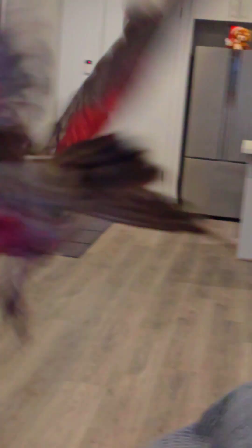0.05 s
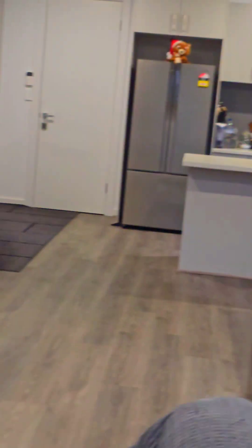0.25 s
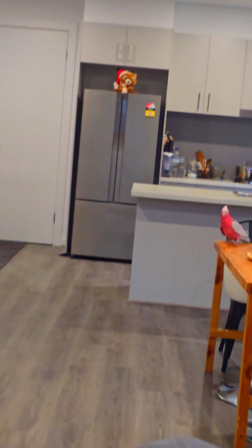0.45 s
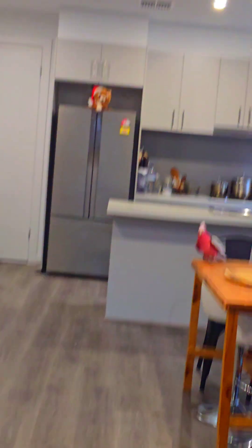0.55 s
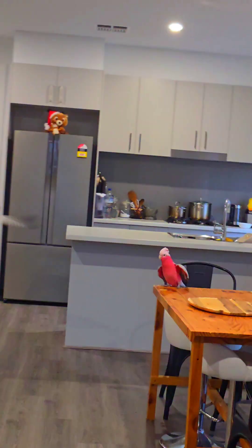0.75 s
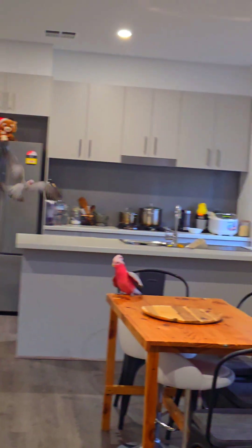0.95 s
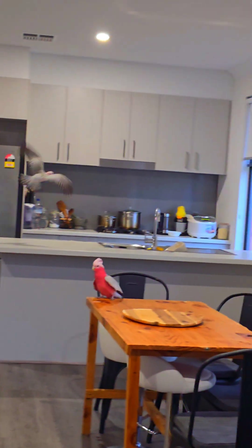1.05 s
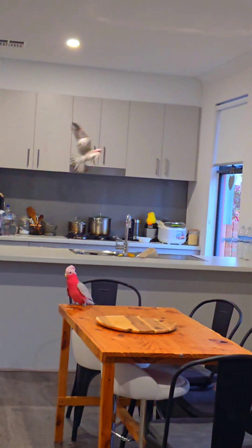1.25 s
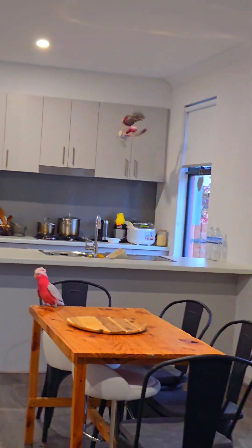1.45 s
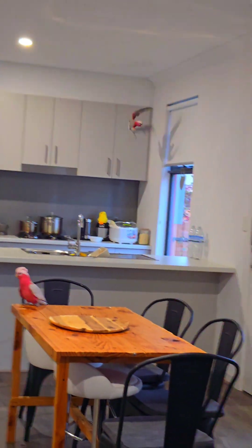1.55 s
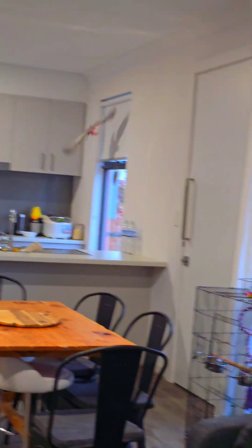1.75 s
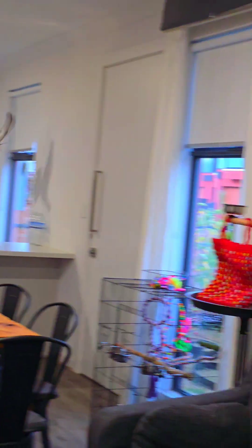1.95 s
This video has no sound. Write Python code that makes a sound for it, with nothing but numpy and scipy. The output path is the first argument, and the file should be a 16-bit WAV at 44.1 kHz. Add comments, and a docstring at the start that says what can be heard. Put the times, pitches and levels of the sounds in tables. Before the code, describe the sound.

A cockatoo screeches loudly close by at about 0.15 seconds, as air from its wings rumbles and thuds against the microphone, hardest on the right near 0.3 seconds. More raspy, croak-edged screeches follow at 0.4 and 0.7 seconds. The wing gusts fade by one second, and two slightly more distant screeches come at 1.0 and 1.5 seconds. Each call rings in the kitchen over a faint house rumble.

```python
"""A cockatoo screeches five times as it takes off beside the microphone and crosses a hard-walled kitchen.
Each screech is a buzz near 800 Hz whose 4th to 6th partials carry the power; most open and close with
a low croak. The draught of the wings buffets the stereo microphone, the room rings after every call,
and the house rumbles faintly behind."""
import sys
import numpy as np
from scipy import signal
from scipy.fft import rfft, irfft
from scipy.io import wavfile
from scipy.ndimage import uniform_filter1d, minimum_filter1d

SR = 44100
rng = np.random.default_rng(int(sys.argv[2]) if len(sys.argv) > 2 else 0)


def bounce(signal):
    """Save signal as a 16-bit WAV file at the path given by the first command-line argument."""
    frames = np.transpose(np.atleast_2d(signal))
    limited = np.clip(frames, -1, 1)
    pcm = np.round(limited * 32767).astype(np.int16)
    wavfile.write(sys.argv[1], SR, pcm)


N = 88200
TIME = np.arange(N) / SR


def amp(db):
    """Decibels to gain."""
    return 10 ** (np.asarray(db) / 20)


def unit(x):
    """Scales to rms 1."""
    return x / np.sqrt(np.mean(abs(x) ** 2) + 1e-20)


def curve(rows, t):
    """Every column of a time table, read at times t."""
    at, *columns = np.transpose(rows)
    return [np.interp(t, at, c) for c in columns]


def read(points, hz):
    """A spectrum table, read on a log-frequency axis."""
    f, value = np.transpose(points)
    return np.interp(np.log(hz + 1), np.log(f + 1), value)


def colour(x, points):
    """Gives x a spectrum, at rms 1."""
    count = x.shape[-1]
    gain = amp(read(points, np.fft.rfftfreq(count, 1 / SR)))
    return unit(irfft(rfft(x) * gain, count))


def wobble(count, hz):
    """Smooth random motion up to a rate, rms about 1."""
    rolloff = 1 + (np.fft.rfftfreq(N, 1 / SR) / hz) ** 4
    return unit(irfft(rfft(rng.standard_normal(N)) / rolloff, N))[:count]


def add(mix, start, sound):
    """Mixes a sound in at a start in seconds."""
    part = mix[max(round(start * SR), 0):][:len(sound)]
    part += sound[:len(part)]


# The syrinx distorts each partial into its multiples. Each row: frequency in Hz, dB against the partial.
SYRINX_OVERTONES = [(6000, -10.5), (7300, -10), (10000, -18), (10900, -31), (12000, -24.5), (13500, -38),
                    (15000, -31)]
# The rasp in the voice. Each row: frequency in Hz, level in dB.
RASP_TONE = [(300, -13.5), (2300, -17), (3000, -3), (4500, 3), (5500, -2.5), (9500, -9), (11000, -23.5),
             (15500, -29.5)]


def screech(rows):
    """Three strong partials of an unsteady buzz, with air rasping through once a cycle."""
    t = np.arange(rows[0][0], rows[-1][0], 1 / SR)
    count = len(t)
    hz, *partial_db, rasp_db = curve(rows, t)
    roughness = amp(np.minimum(rasp_db - np.max(partial_db, 0), 0))  # more rasp, shakier pitch
    jitter = 0.0089 * (1 + 2.4 * roughness) * wobble(count, hz=470)
    waver = 0.0059 * wobble(count, hz=96.2)
    turns = np.cumsum(hz * (1 + jitter + waver)) / SR
    tone = np.zeros(count)
    for k, db in enumerate(partial_db, 4):
        phase = 2 * np.pi * k * turns
        overtones = sum(amp(read(SYRINX_OVERTONES, m * k * hz)) * np.cos(m * phase) for m in (2, 3, 4))
        shimmer = 1 + 0.34 * wobble(count, hz=242)
        tone += amp(db) * shimmer * (np.cos(phase) + overtones)
    puffs = np.exp(-(turns % 1) / .3)
    air = unit(puffs * rng.standard_normal(N)[:count])
    upper_partials = unit(sum(np.cos(2 * np.pi * (k * turns + rng.random())) for k in range(7, 21)))
    rattle = amp(4 * wobble(count, hz=170))
    rasp = colour((air + 0.58 * upper_partials) * rattle, RASP_TONE)
    attack = np.sin(np.pi / 2 * np.minimum((t - t[0]) / 0.0057, 1)) ** 2
    release = np.minimum((t[-1] - t) / 0.002, 1)
    return t[0], (np.sqrt(2) * tone + amp(rasp_db) * rasp) * attack * release


# The throaty colour of a croak. Each row: frequency in Hz, level in dB.
CROAK_SPECTRUM = [(300, -25), (550, -2.5), (1000, -4), (1400, 2.5), (2100, -6), (5000, -6.5)]


def croak(start, length, first_hz, last_hz, db, fundamental_db, hoarse):
    """The bare buzz, strong in its low partials; hoarseness shakes its pitch and adds air."""
    count = round(length * SR)
    jitter = hoarse * 0.083 * wobble(count, hz=470)
    hz = np.linspace(first_hz, last_hz, count) * (1 + jitter)
    turns = np.cumsum(hz) / SR
    buzz = np.zeros(count)
    for k in range(1, 7):
        partial_db = read(CROAK_SPECTRUM, k * hz) + fundamental_db * (k == 1)
        buzz += amp(partial_db) * np.cos(2 * np.pi * k * turns)
    air = colour(rng.standard_normal(N), CROAK_SPECTRUM + [(8000, -33)])[:count]
    return start, amp(db) * (unit(buzz) + hoarse * 0.44 * air) * np.hanning(count)


# Five screeches, one list apiece. Each row: time in seconds, buzz pitch in Hz,
# then levels in dB of the 4th, 5th and 6th partials and of the rasp.
SCREECH_CONTOURS = [
    [(.142, 658, -59, -70, -43, -24), (.163, 708, -42, -8, -23, -13), (.194, 745.3, -36, -9.5, -41, -31),
     (.202, 786.3, -11.5, -23, -45, -47), (.228, 776, -21.5, -10, -28, -43),
     (.239, 818, -27, -16.5, -12, -34), (.29, 826.2, -50, -17, -12, -24), (.305, 845, -36, -10.5, -41, -50)],
    [(.414, 669.4, -58, -46, -47, -21), (.432, 695.4, -33.5, -19.5, -34, -27),
     (.476, 754, -19.5, -12.5, -21, -13.5), (.486, 800, -36, -23, -13.5, -21),
     (.527, 733.5, -47, -26, -12, -20.5), (.545, 822.2, -49, -28, -15, -25),
     (.588, 845, -47, -39, -11.5, -25.5), (.602, 834, -41, -47, -37, -42)],
    [(.7, 714.3, -27.5, -34, -51, -20), (.718, 737.4, -27.5, -18, -19, -25),
     (.743, 778.4, -40, -11.5, -42, -25), (.769, 816.2, -41, -9, -38, -25),
     (.785, 805.7, -50, -32, -8, -24.5), (.803, 829.5, -55, -36, -9, -28),
     (.854, 821.5, -35, -44, -12.5, -34), (.869, 793, -29, -15, -44, -38)],
    [(1.02, 697.6, -30.5, -17.5, -47, -19.5), (1.037, 747.6, -19.5, -18, -54, -37),
     (1.062, 761.1, -37.5, -11, -28, -44), (1.102, 807.6, -39, -15, -53, -33),
     (1.118, 779, -30, -7, -48, -35)],
    [(1.469, 656.2, -46.5, -31, -50, -36), (1.5, 733.7, -19.5, -23, -33, -26.5),
     (1.517, 785.4, -13, -20, -44, -25.5), (1.541, 778.7, -25.5, -8.5, -41, -31),
     (1.568, 801, -27, -13.5, -38, -31.5), (1.585, 859, -34, -15, -13, -26),
     (1.604, 829, -50, -14.5, -27, -47), (1.62, 840, -45, -47, -38, -48)],
]
# A short, soft chirp after the second screech, with the same columns.
CHIRP_CONTOUR = [(.65, 746, -36, -24, -51, -33.5), (.686, 852, -38, -28.5, -55, -27),
                 (.696, 786, -58, -34, -58, -45)]
# Croaks as the voice starts and stops. Each row: start and length in seconds, first and last pitch in Hz,
# level in dB, lift of the fundamental in dB, hoarseness (0 is clean).
EDGE_CROAKS = [(0.135, 0.026, 588, 769, -23, 1, 0.86), (0.293, 0.029, 780, 698, -25.5, -3, 0.8),
               (0.405, 0.022, 547, 631, -31.5, -2.5, 0.64), (.56, 0.0443, 800.4, 690, -23, -5.5, 1.02),
               (0.846, 0.064, 720, 770, -29, 0, 0.6), (0.997, 0.031, 627, 611, -35, 0, 0.9),
               (1.461, 0.019, 497, 579, -33.5, 3.5, .8), (1.598, 0.037, 887, 824, -35, 3.5, 0.53)]
# The bird flies away from the microphone. Each row: time in seconds, gain of the direct sound in dB.
FLIGHT_AWAY = [(.15, 0.5), (.6, -1), (1.1, -8.5), (1.6, -8.5)]


def cockatoo():
    """The calls, direct and thrown back by the kitchen, with the screech band louder on the left."""
    screeches, croaks = np.zeros(N), np.zeros(N)
    for rows in SCREECH_CONTOURS + [CHIRP_CONTOUR]:
        add(screeches, *screech(rows))
    for row in EDGE_CROAKS:
        add(croaks, *croak(*row))
    left = amp(curve(FLIGHT_AWAY, TIME)[0]) * (screeches + croaks)
    right = np.interp(TIME - 3 / SR, TIME, left)  # arrives three samples later
    heard = np.array([left, right]) + amp(-3) * kitchen(screeches + amp(0.5) * croaks)
    band = signal.sosfiltfilt(signal.butter(2, [2200, 6000], "band", fs=SR, output="sos"), heard)
    return heard + band * (amp([[2.5], [-2.5]]) - 1)


# Wingbeats felt at the microphone. Each row: time in seconds, left and right level in dB.
DRAUGHT_LEVELS = [(0, -58, -73), (.07, -28.5, -32), (.16, -35.5, -31), (.29, -26, -27), (.41, -43.5, -39.5),
                  (.51, -52, -50), (.59, -33, -34), (.635, -48, -47), (.68, -36, -27.5), (.77, -45, -40.5),
                  (.835, -34, -28), (.94, -33, -65), (1.03, -68, -75)]
# Their rumble. Each row: frequency in Hz, level in dB.
DRAUGHT_SPECTRUM = [(15, -15.5), (40, 1), (70, -10), (250, -28), (600, -35), (2000, -47)]


def wing_draught():
    """Lumpy air from the wings, its turbulence unrelated at the two microphone ports."""
    turbulence = colour(rng.standard_normal((2, N)), DRAUGHT_SPECTRUM)
    lumps_db = 3 * wobble(N, hz=21.2)
    return turbulence * amp(curve(DRAUGHT_LEVELS, TIME) + lumps_db)


# Gusts at close range. Each row: start in seconds, length in seconds, level at the right port in dB.
CLOSE_GUSTS = [(0.232, 0.02, -11.5), (0.264, 0.036, -11), (0.287, 0.0343, -18.5)]
# Their thud. Each row: frequency in Hz, level in dB.
GUST_SPECTRUM = [(15, -3), (55, -4), (100, -8), (350, -26), (900, -35), (2500, -73)]


def takeoff_gusts(push_hz=55.6):
    """Hard gusts hit the right port, each a slow swing of pressure mixed with turbulence."""
    gusts = np.zeros(N)
    for start, length, db in CLOSE_GUSTS:
        count = round(length * SR)
        push = amp(-5.5) * unit(np.sin(2 * np.pi * push_hz * TIME[:count]))
        lump = push + colour(rng.standard_normal(N), GUST_SPECTRUM)[:count]
        gust = (lump - lump.mean()) * signal.windows.tukey(count, .6)
        add(gusts, start, amp(db) * unit(gust))
    return gusts * amp([[-32], [0]])


# Hard walls all round the microphone. Each row: frequency in Hz, seconds to die away by 60 dB.
KITCHEN_T60 = [(300, .45), (1500, .68), (4000, .67), (8000, .53), (15000, .42)]


def kitchen(calls, early_spread_s=.022):
    """Early reflections over a dense tail that rings longest in the screech band."""
    hz, t, noise = signal.stft(rng.standard_normal((2, SR)), SR, nperseg=256)
    decay = amp(-60 * t / read(KITCHEN_T60, hz)[:, None])
    tail = signal.istft(noise * decay, SR, nperseg=256)[1][:, :SR]
    tail *= np.minimum(TIME[:SR] / 0.002, 1)
    tail /= np.linalg.norm(tail, axis=1, keepdims=True)
    for side, taps in zip(tail, rng.random(size=(2, 8))):
        arrivals = (SR * (.002 + early_spread_s * taps)).astype(int)
        side[arrivals] += amp(-3) / np.sqrt(len(taps))
    return signal.fftconvolve(calls[None], tail, axes=1)[:, :N]


# A screech still hanging in the kitchen. Each row: frequency in Hz, level in dB.
ECHO_SPECTRUM = [(1100, -24), (1480, 6.5), (2300, -25), (3950, 6.5), (4900, 4), (5700, -22), (6180, 9.5),
                 (6800, -21)]


def lingering_echo(t60_s=0.76):
    """At the start the room still rings from an earlier call."""
    return colour(rng.standard_normal((2, N)), ECHO_SPECTRUM) * amp(-39.5 - 60 * TIME / t60_s)


# Room tone, far behind the bird. Each row: frequency in Hz, level in dB.
RUMBLE_SPECTRUM = [(45, 1.5), (250, -6), (600, -19), (1500, -25), (5000, -27.5), (15000, -47)]
# Its slow drift. Each row: time in seconds, level in dB.
RUMBLE_LEVELS = [(0, -43), (1.1, -53), (1.7, -43), (2, -47.5)]


def house_rumble():
    """Low background of the house, mostly the same at both ports."""
    own, shared = rng.standard_normal((2, N)), rng.standard_normal(N)
    return colour(own + 2.35 * shared, RUMBLE_SPECTRUM) * amp(curve(RUMBLE_LEVELS, TIME)[0])


def scene():
    """Bird, wing wind and room, from one spot in the kitchen."""
    return cockatoo() + lingering_echo() + wing_draught() + takeoff_gusts() + house_rumble()


def record(dry, ceiling=0.89, cutoff_hz=15650):
    """A quick limiter rounds off the loudest peaks; then the highest treble is cut."""
    gain = np.minimum(1, ceiling / (abs(dry).max(0) + 1e-9))
    gain = uniform_filter1d(minimum_filter1d(gain, size=300), size=300)
    lowpass = signal.firwin(511, cutoff_hz, window=("kaiser", 9), fs=SR)
    return signal.oaconvolve(dry * gain, lowpass[None], "same")


dry = scene()
out = record(dry)
bounce(out)
```